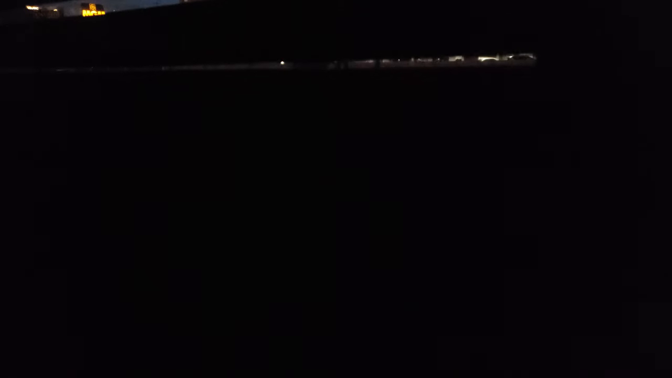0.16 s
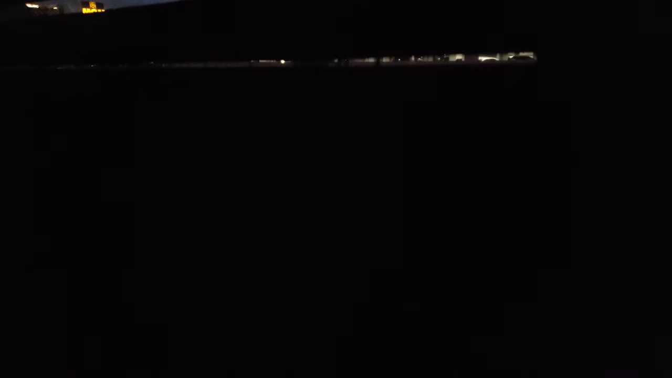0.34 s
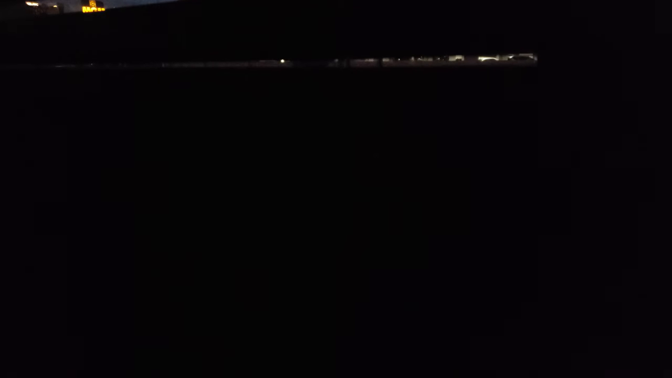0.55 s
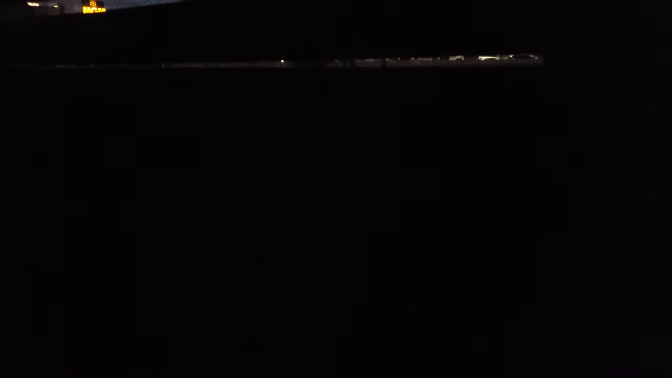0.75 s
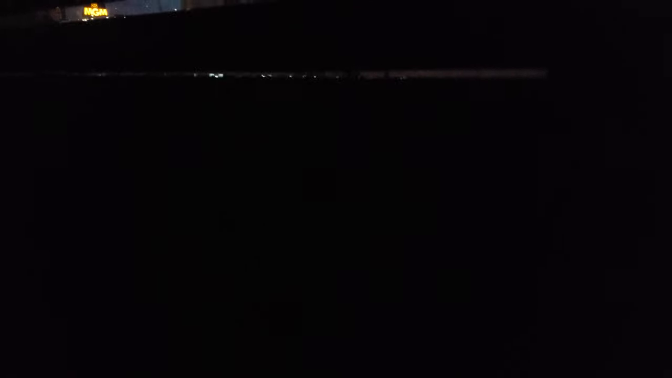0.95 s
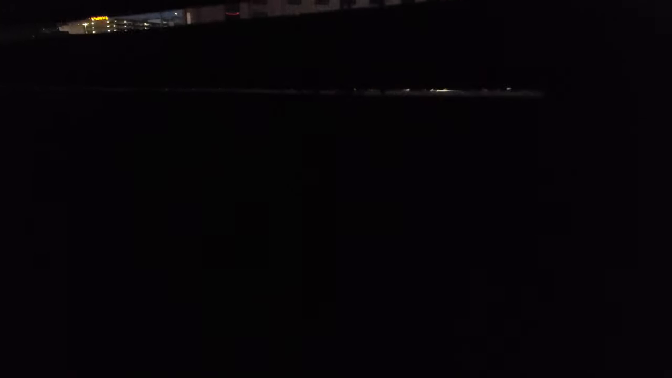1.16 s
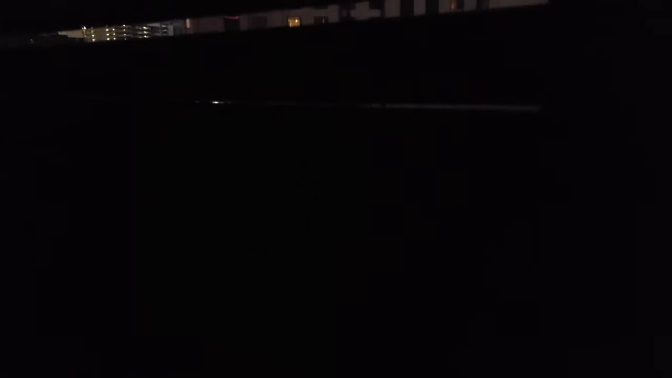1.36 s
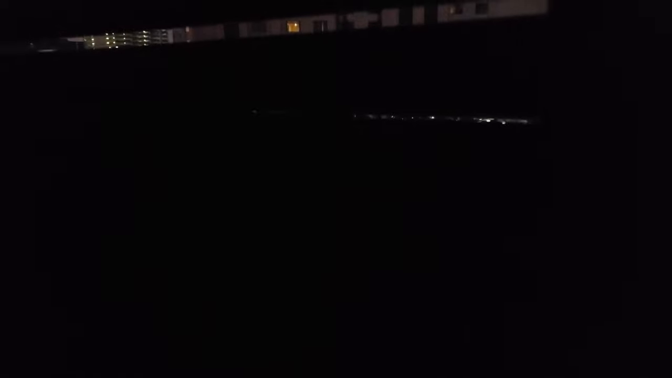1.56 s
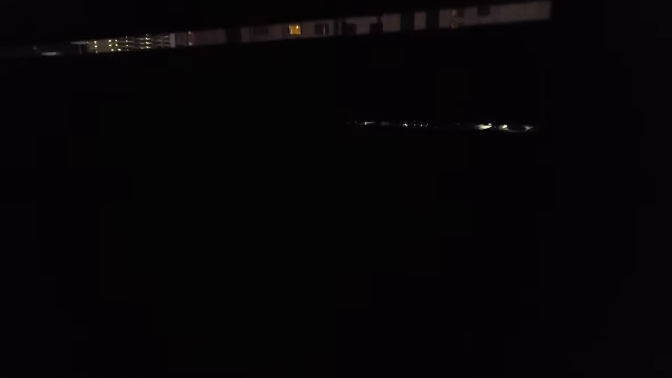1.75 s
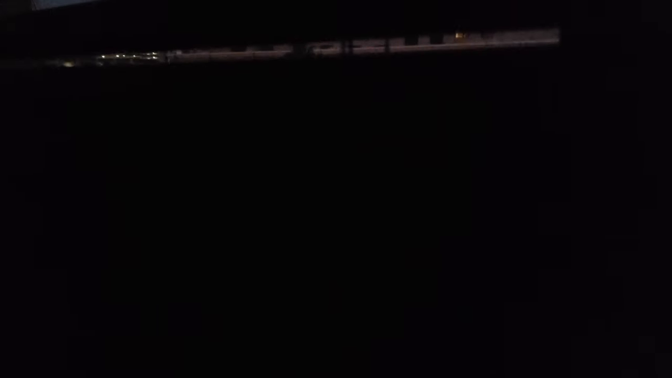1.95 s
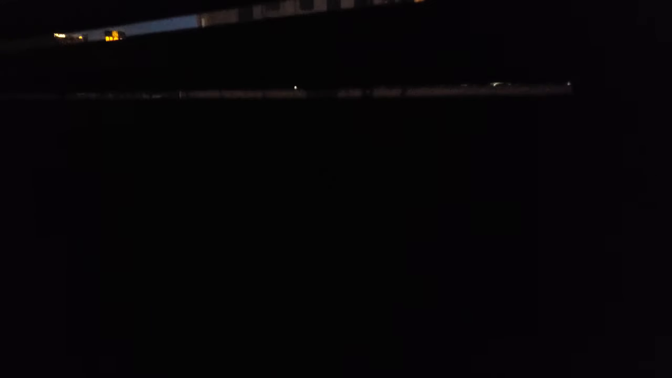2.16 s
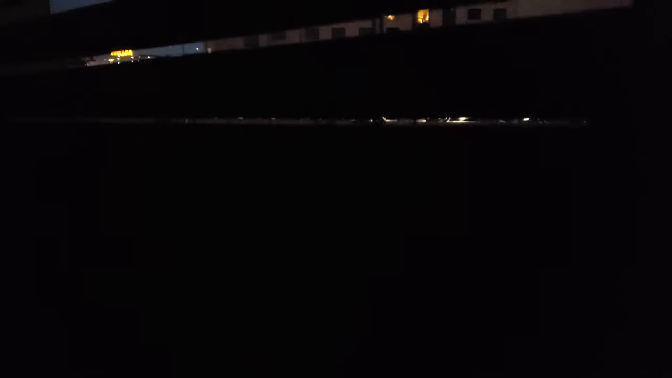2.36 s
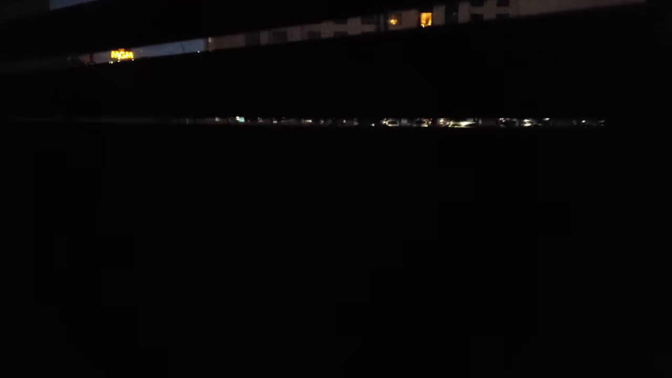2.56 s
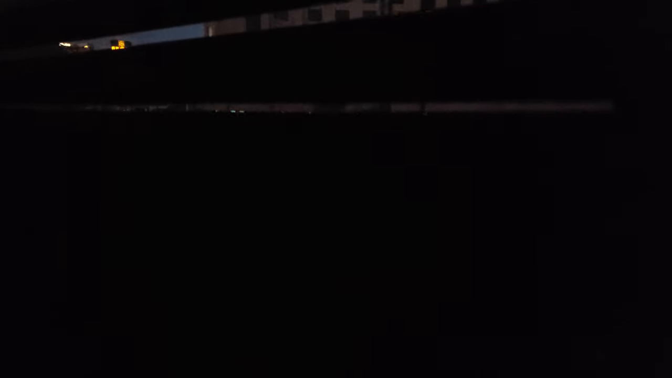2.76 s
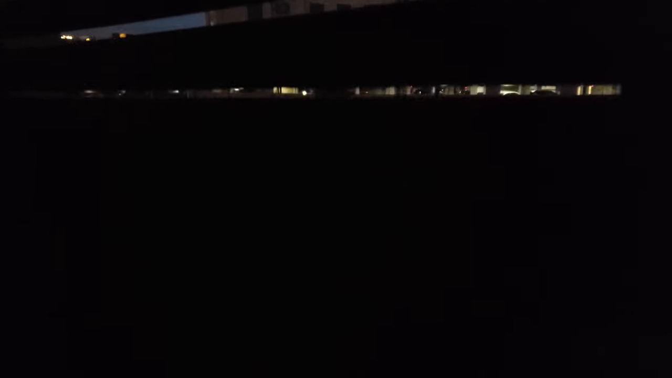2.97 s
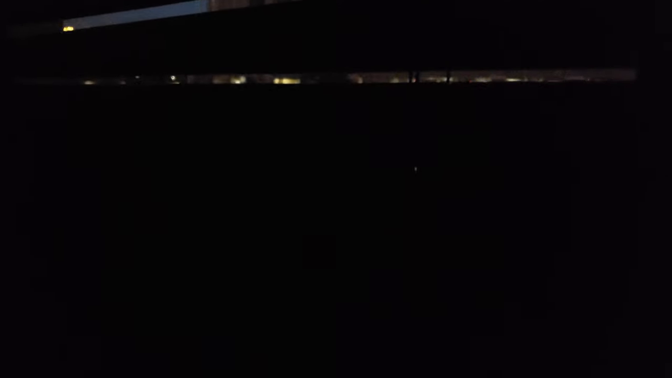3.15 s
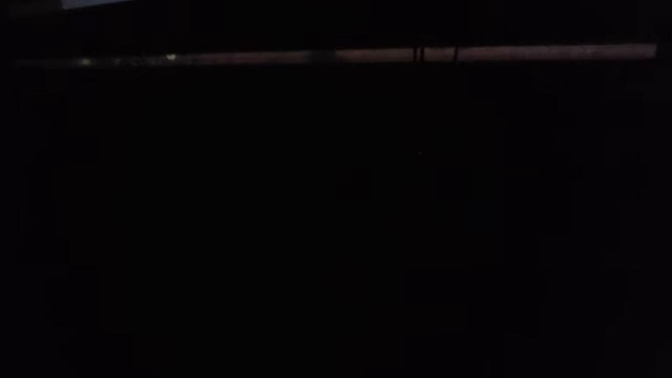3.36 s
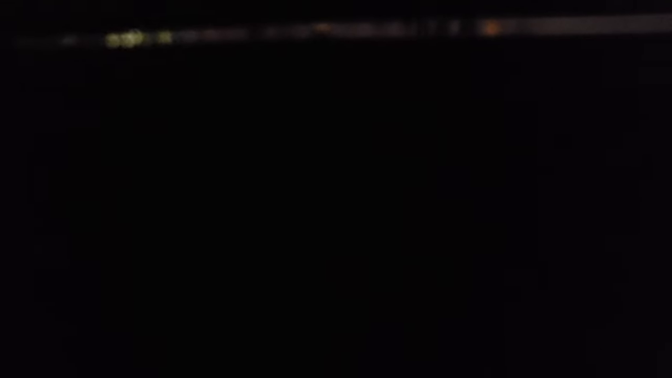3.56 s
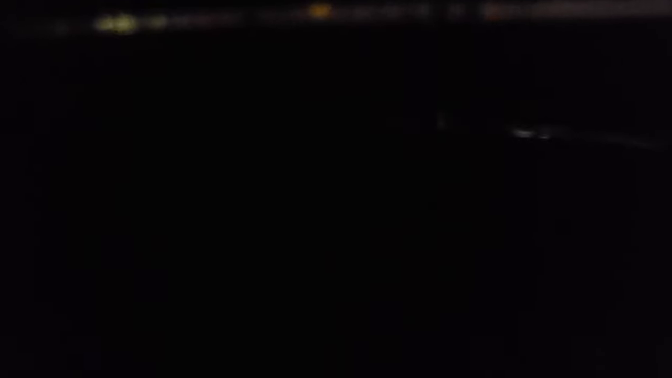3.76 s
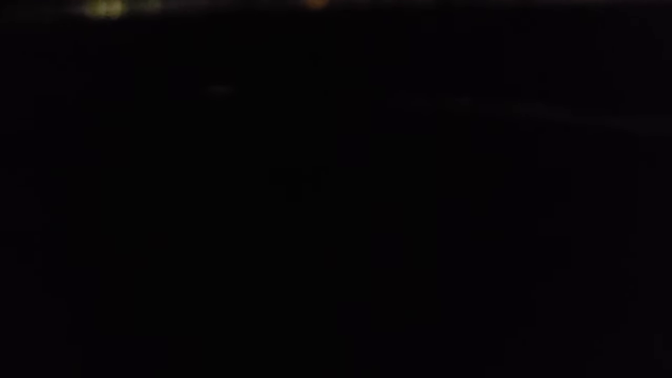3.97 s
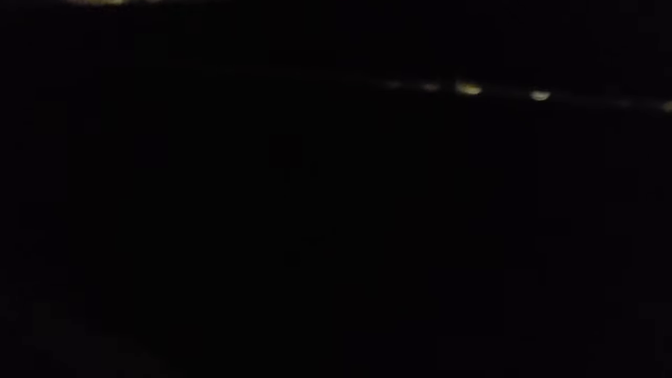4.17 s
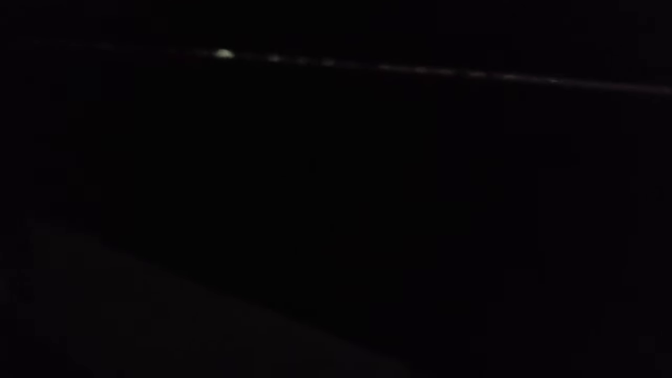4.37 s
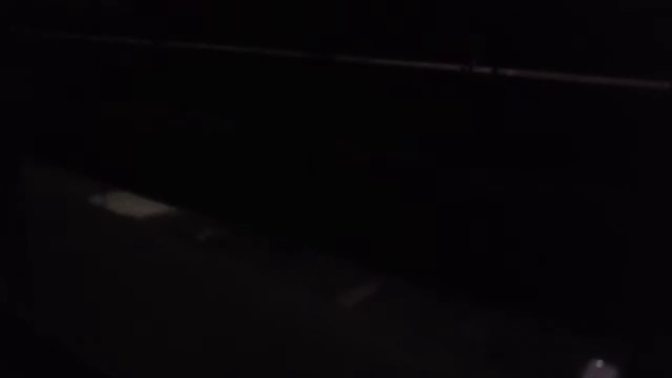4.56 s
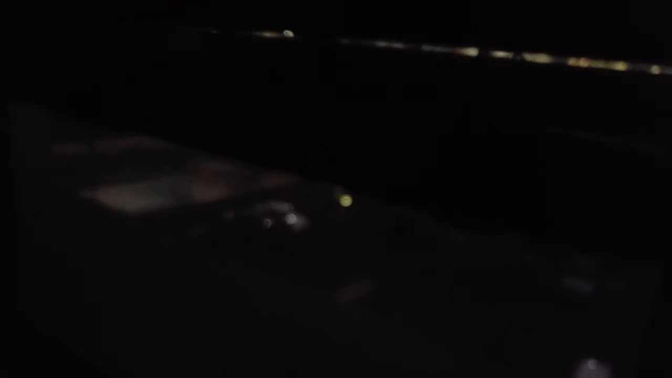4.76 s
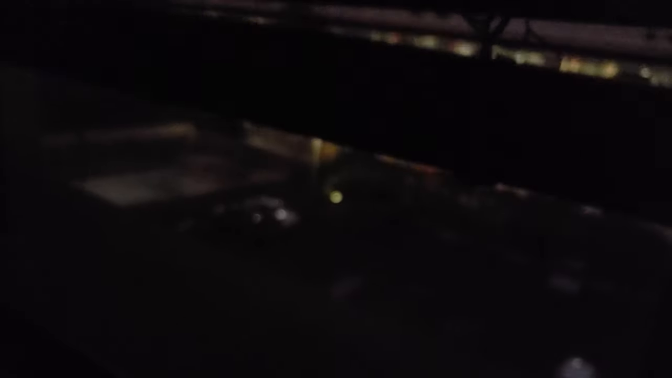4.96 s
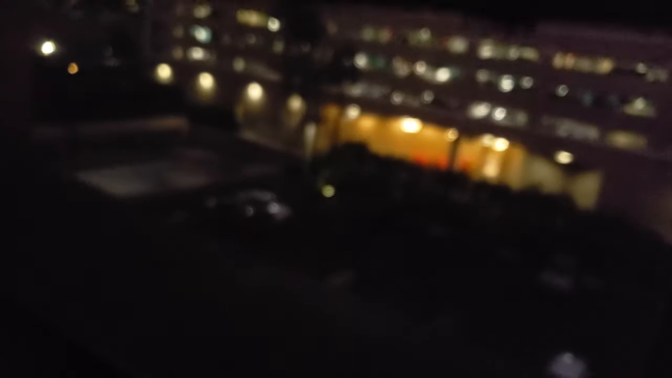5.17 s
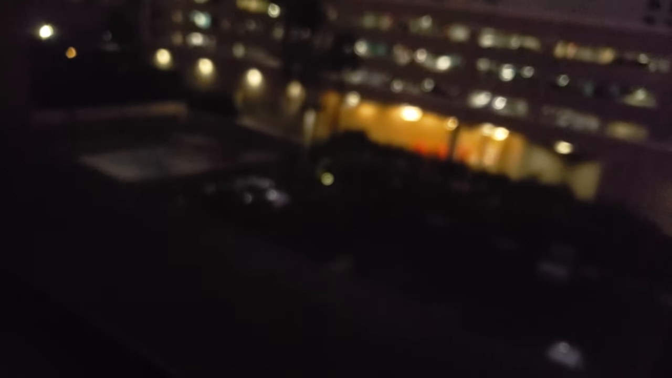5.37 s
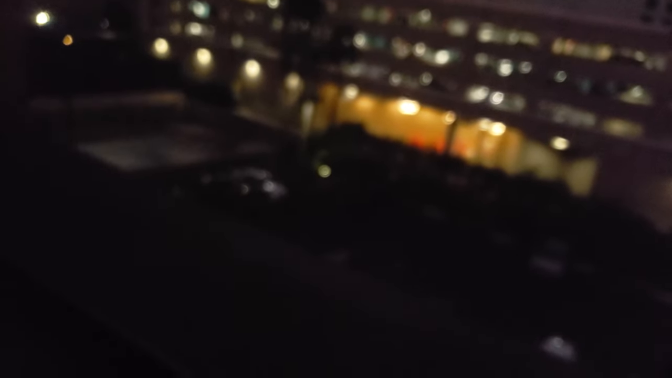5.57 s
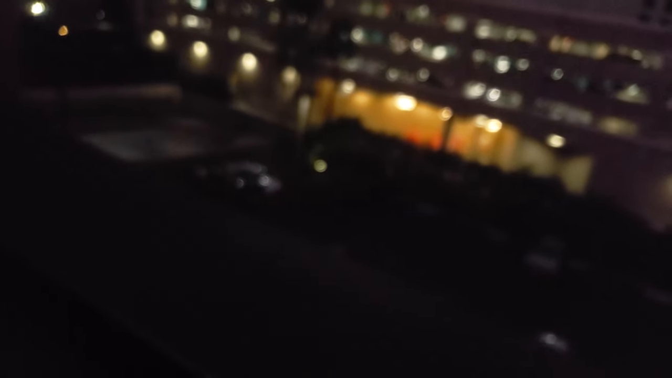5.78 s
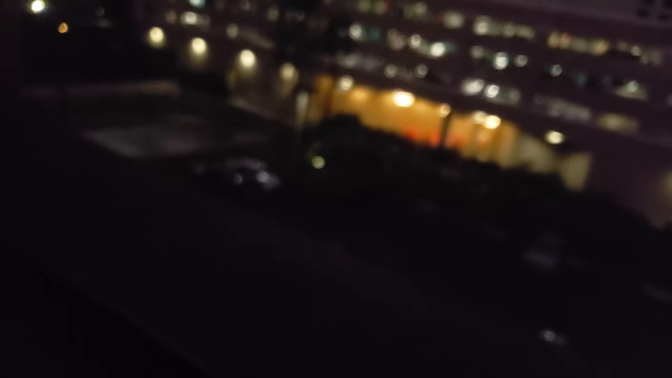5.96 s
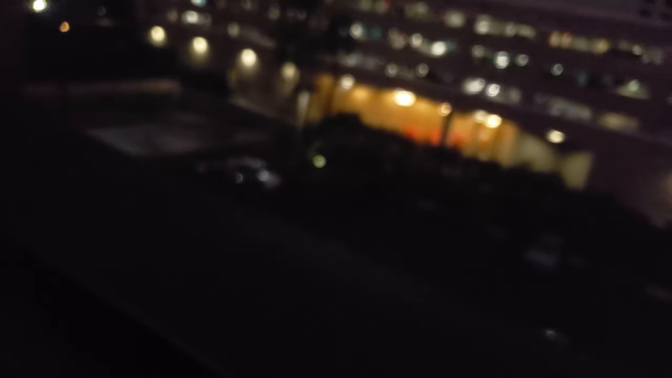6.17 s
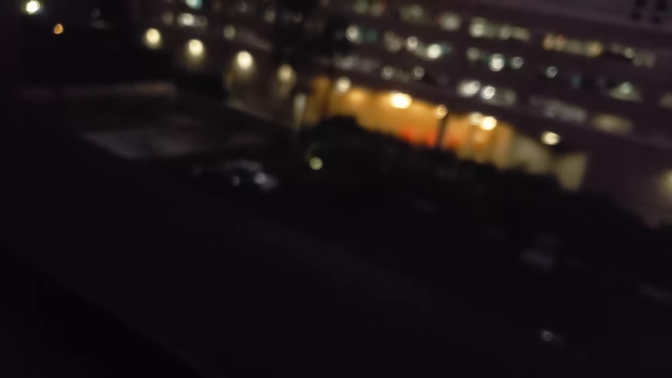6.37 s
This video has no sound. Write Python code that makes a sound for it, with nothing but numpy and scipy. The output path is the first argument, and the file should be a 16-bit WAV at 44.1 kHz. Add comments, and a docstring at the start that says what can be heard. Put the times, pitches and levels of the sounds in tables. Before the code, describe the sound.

Close stereo microphones in a quiet room with faint outdoor rumble and hiss. Fingers brush lightly, with small ticks, creaks and little squeaks. Then a slatted window blind is pulled up: the cord whirrs, slats rustle and rattle densely, with irregular sharp clacks. The bottom rail bumps home with a dull knock and a bright snap, the rattling quickly fades, and a few weak clicks settle.

```python
"""A slatted window blind is pulled up in a quiet room, heard from close by with two small microphones.
Slats and cord strike and rattle as short noise bursts that ring in the blind's resonances; tiny chance contacts
rustle, and bands of noise whirr as the cord runs through the head rail. Before that, fingers brush and find the
cord with light ticks and creaks; at the end the bottom rail bumps home. The room answers with noise echoes.
Below it all lies shaped noise: low rumble from outside and a faint hiss."""
import sys
import numpy as np
from scipy import signal
from scipy.fft import rfft, irfft, next_fast_len
from scipy.io import wavfile
from scipy.ndimage import uniform_filter1d

SR = 44100
rng = np.random.default_rng(int(sys.argv[2]) if len(sys.argv) > 2 else 0)


def field_ratio(decibels):
    """Amplitude ratio for a level in dB (20 dB per decade); scalars and array-likes work."""
    return 10 ** (np.asarray(decibels, dtype=float) / 20)


def master_out(mix):
    """Clip the mix to full scale and print it as 16-bit PCM to the path in sys.argv[1]."""
    frames = np.transpose(np.atleast_2d(mix))
    ceiling = np.clip(frames, -1, 1)
    pcm = np.round(ceiling * 32767).astype(np.int16)
    wavfile.write(sys.argv[1], SR, pcm)


N = 283197   # length [samples]

# resonances of rail and slats: (pitch [Hz], width [Hz], level against the plain contact [dB])
BLIND_MODES = [(764, 125, 3), (883, 110, 5), (1170, 910, 2), (1317, 52, -10), (1825, 110, -6),
               (2260, 210, -0.5), (2755, 550, -2.5), (3230, 200, 0.5), (3950, 1000, -2), (4500, 560, -17.5),
               (6500, 2300, -7), (6960, 81, -12), (11470, 5400, 2), (14400, 570, -2.5)]
# how hard the blind is moved: (time [s], slat rustle level [dB], extra brightness [dB])
MOTION = [(0, -91, -7), (.41, -89, -1.5), (1.23, -83, 4.5), (1.36, -81, 2), (1.74, -77.5, 3),
          (1.76, -58.5, -4), (1.88, -67, 9), (2.0, -93, -1), (2.2, -73, -3), (2.3, -78.5, 4),
          (2.4, -84, -6), (2.77, -86.5, 1), (3.06, -74.5, 0.5), (3.15, -62, 1), (3.18, -52, -4),
          (3.26, -52, -1), (3.35, -47, -5.5), (3.5, -49.5, 2), (3.66, -44, -3), (3.79, -45, 0),
          (3.97, -42.5, -1.5), (4.11, -46, -1), (4.45, -45, 3), (4.67, -47.5, -1), (4.78, -53, 7),
          (4.88, -54, -1), (5.02, -63, 2), (5.06, -40.5, -2), (5.13, -41.5, 3.5), (5.22, -46.5, -1),
          (5.42, -60.5, 0.5), (5.6, -65, -1.5), (5.65, -56, 1), (5.92, -65, -3), (6.08, -62, 1),
          (6.28, -83, 5), (6.42, -90.5, 13)]
FULL_PULL_DB = -45   # the rustle level that counts as a full pull
CLACK_T60_S = 0.019   # time in which a clack's burst falls by 60 dB


def in_time(rows):
    """Reads the columns of a table at every sample; the first column is the time."""
    s, *columns = np.transpose(rows)
    t = np.arange(N) / SR
    return [np.interp(t, s, column) for column in columns]


def at_hz(points, hz):
    """Reads a table over frequency, on a logarithmic axis."""
    table_hz, values = np.transpose(points)
    return np.interp(np.log(hz + 1), np.log(table_hz), values)


def rms_one(x):
    """Scales a sound to an rms of 1."""
    return x / np.sqrt(np.mean(x ** 2) + 1e-30)


def panned(db):
    """Left and right gains for a level difference; above 0 dB the left is louder."""
    return field_ratio(np.array([db / 2, -db / 2]))


def wavering(span_s):
    """A slow random drift around 0 with an rms of 1: noise smoothed twice."""
    span = max(int(span_s * SR), 1)
    smooth = uniform_filter1d(rng.standard_normal(N), span)
    return rms_one(uniform_filter1d(smooth, span))


def two_ears(pair, gain):
    """Turns two unrelated signals into left and right, alike in the bass, and colours them by gain(hz)."""
    # how alike left and right are: (frequency [Hz], likeness [0 to 1])
    likeness = [(60, 0.93), (120, 0.99), (240, 0.92), (480, 0.82), (950, 0.47), (1890, 0.02), (3770, 0.013),
                (7520, 0.02), (15000, 0.01)]
    # the two microphones differ: (frequency [Hz], left minus right [dB])
    left_colour = [(60, 2.0), (120, 2.5), (240, 2), (480, 3.5), (950, 0.5), (1890, 2), (3770, 2.5),
                   (7520, 5.5), (15000, -6)]
    hz = np.fft.rfftfreq(pair.shape[1], 1 / SR)
    alike = np.clip(at_hz(likeness, hz), 0, 1)
    mid, side = rfft(pair)
    mid = mid * np.sqrt(1 + alike)
    side = side * np.sqrt(1 - alike)
    left_right = np.array([mid + side, mid - side])
    return irfft(left_right * gain(hz) * panned(at_hz(left_colour, hz)), pair.shape[1])


def three_bands(x):
    """Splits into low, middle and treble parts that overlap gently and add up to the whole."""
    hz = np.fft.rfftfreq(x.shape[1], 1 / SR)
    low = 1 / (1 + (hz / 2300) ** 4)
    treble = 1 / (1 + (9000 / (hz + 1)) ** 8)
    return [irfft(rfft(x) * share, x.shape[1]) for share in (low, 1 - low - treble, treble)]


def one_band(size, centre_hz, width_hz):
    """Stereo noise in one resonance."""
    return two_ears(rng.standard_normal((2, size)), lambda hz: 1 / (1 + (2 * (hz - centre_hz) / width_hz) ** 2))


def resonances(modes, hz, chance_db):
    """A flat response with resonances on top, each made stronger or weaker by its chance_db."""
    response = 1
    for (mode_hz, width_hz, db), chance in zip(modes, chance_db):
        response = response + field_ratio(db + chance) / (1 + 2j * (hz - mode_hz) / width_hz)
    return response


def coloured(modes, hz, chance_db):
    """Response to a contact: its plain colour times the resonances of what is struck."""
    # plain contact: (frequency [Hz], level per Hz [dB])
    contact = [(180, -45.5), (300, -13.5), (411, -15), (553, -12), (708, -11), (985, -8.5), (1510, -2),
               (2520, -12), (7140, -12.5), (9600, -13.5), (11700, -17.5)]
    return field_ratio(at_hz(contact, hz)) * resonances(modes, hz, chance_db)


def strikes(table, modes, rise_s, t60_s):
    """Each strike is a noise burst that dies in a few ms and excites every mode with a chance strength."""
    size, lead = 2048, 256   # samples; the lead is the stretch before the hit
    out = np.zeros((2, N + size))
    t = np.maximum(np.arange(size) - lead, 0) / SR
    envelope = field_ratio(-60 * t / t60_s) * (1 - np.exp(-t / rise_s))
    for s, middle_db, low_db, treble_db, pan_db in table:
        burst = rng.standard_normal((2, size)) * envelope
        chance_db = 4 * rng.standard_normal(len(modes))
        ringing = two_ears(burst, lambda hz: coloured(modes, hz, chance_db))
        hit = 0
        for db, band in zip((low_db, middle_db, treble_db), three_bands(ringing)):
            peak = np.abs(band).max(axis=1, keepdims=True)
            hit = hit + field_ratio(db) * band / peak
        at = round(s * SR) - lead
        out[:, at:at + size] += hit * panned(pan_db)[:, None]
    return out[:, :N]


def quiet_air():
    """Rumble from outside, stronger at a few drone pitches, and hiss: shaped noise that swells and sinks."""
    # rumble and hiss: (frequency [Hz], level per Hz [dB])
    air_colour = [(15, -25), (25, -4), (70, 0), (92, 1), (154, -1), (330, -16), (457, -28), (496, -20),
                  (617, -23), (726, -23.5), (1060, -22), (1510, -57), (8370, -55), (15200, -42),
                  (16500, -60)]
    # resonances in the rumble: (pitch [Hz], width [Hz], level against the plain rumble [dB])
    drones = [(62, 7.8, -2.5), (140, 5, 7), (281.7, 8.7, 7), (357, 15, 0.5), (739, 42, 6.5)]
    # loudness of the whole: (time [s], level [dB])
    air_level = [(0.0, -51.5), (0.5, -50), (0.95, -51), (1.82, -48), (2.05, -50.5), (3.0, -50), (3.2, -49),
                 (4.54, -50.5), (4.83, -46.5), (5.11, -46.5), (5.4, -55.5), (6.42, -51.5)]

    def colour(hz):
        return field_ratio(at_hz(air_colour, hz)) * resonances(drones, hz, np.zeros(len(drones)))

    noise = two_ears(rng.standard_normal((2, next_fast_len(N))), colour)[:, :N]
    return rms_one(noise) * field_ratio(in_time(air_level)[0])


def room(x):
    """Diffuse echoes: noise that dies at its own pace in each octave, alike on both sides in the bass."""
    # how long echoes last: (frequency [Hz], time to fall by 60 dB [s])
    echo_t60 = [(300, 0.99), (1500, 0.2), (5000, 0.43), (15000, 0.06)]
    t, tail = np.arange(SR // 2) / SR, 0
    for hz in 125 * 2. ** np.arange(8):
        edges_hz = [hz / np.sqrt(2), min(hz * np.sqrt(2), 20000)]
        octave = signal.butter(1, edges_hz, "band", fs=SR, output="sos")
        noise = two_ears(rng.standard_normal((2, len(t))), np.ones_like)
        t60_s = at_hz(echo_t60, hz)
        tail = tail + signal.sosfilt(octave, noise) * field_ratio(-60 * t / t60_s) / np.sqrt(t60_s)
    tail = tail * (1 - np.exp(-t / 0.0028))   # the echoes set in within a few ms
    tail = tail / np.sqrt(np.sum(tail ** 2) / 2)
    return signal.fftconvolve(x, tail, axes=1)[:, :N]


def fingers():
    """Skin sliding on a smooth surface close to the right microphone: thin, high noise that flutters."""
    # brushes: (start [s], hold [s], level [dB])
    brushes = [(0.563, .08, -81), (.9, 0.35, -79.5), (1.29, 0.16, -75), (1.534, .05, -70),
               (1.747, 0.097, -71), (2.083, .05, -78), (2.273, 0.065, -59)]
    attack_db_per_s, release_db_per_s = 600, 400
    t, strength = np.arange(N) / SR, 0
    for s, hold, db in brushes:
        before, after = np.maximum(s - t, 0), np.maximum(t - s - hold, 0)
        strength = strength + field_ratio(db - attack_db_per_s * before - release_db_per_s * after)
    noise = rms_one(one_band(next_fast_len(N), 14900, 4400)[:, :N])
    flutter = field_ratio(1.0 * wavering(0.0072))
    return strength * noise * flutter * panned(-14.5)[:, None]


def ticks():
    """Light ticks close to the microphones: very short bursts that ring in high resonances."""
    # peaks: (time [s], middle level [dB], low level [dB], treble level [dB], left minus right [dB])
    tick_rows = [(1.3683, -67, -69, -51, -1), (1.5294, -75, -77, -50, -10), (1.728, -58, -67, -47, 1),
                 (2.1278, -43, -46.5, -29.5, -12), (2.1556, -39, -59, -55, 13), (2.1676, -30, -62, -31, -2),
                 (2.1912, -31.5, -68, -49, 9), (2.1977, -39, -56, -31.5, -14), (2.2024, -45, -65, -38, -21),
                 (2.3333, -52, -63, -32.5, -13), (5.0603, -27, -37, -8, -5), (5.0887, -8, -12, -1.5, -8),
                 (5.0997, -28, -28, -6, -8)]
    # what the ticks ring with: (pitch [Hz], width [Hz], level against the plain contact [dB])
    tick_modes = [(1930, 280, -10), (3600, 600, 0.5), (5000, 1200, 5.5), (6930, 430, 15.5), (12000, 700, 5),
                  (15000, 1800, 6)]
    return strikes(tick_rows, tick_modes, rise_s=0.00006, t60_s=0.006)


def rings():
    """Creaks, knocks and squeaks: noise in one resonance that swells and dies, at most 0.19 s long."""
    # creaks that swell fast and die: (time [s], pitch [Hz], width [Hz], level [dB], 60 dB decay time [s])
    creaks = [(1.29, 1840, 250, -68.5, 0.16), (1.289, 6600, 1500, -73, 0.32),
              (1.549, 6500, 1800, -70, 0.19), (1.81, 4780, 800, -54.5, 0.12),
              (1.799, 6800, 1500, -61.5, .25), (3.31, 2900, 1000, -46, 0.17)]
    # knocks that ring at one pitch: (time [s], pitch [Hz], width [Hz], level [dB], 60 dB decay time [s])
    knocks = [(1.404, 610, 202, -55.5, 0.36), (1.587, 590, 250, -55, 0.26), (1.749, 1863, 110, -42, 0.16),
              (1.751, 2160, 900, -51.5, 0.47), (2.187, 3600, 400, -56, 0.23),
              (4.734, 350, 200, -40.5, 0.54), (5.039, 333, 140, -30, 0.082), (5.058, 213, 123, -37, 0.091),
              (5.040, 151, 60, -35.5, 0.1), (5.041, 697, 250, -34.5, 0.15),
              (5.496, 1140, 600, -48.5, 0.084), (5.646, 2950, 300, -51, 0.027), (5.833, 968, 510, -58, .14)]
    # squeaks that grow until the finger lets go: (start [s], pitch [Hz], width [Hz], level [dB], length [s])
    squeaks = [(2.054, 5000, 400, -61.5, 0.11), (2.06, 1860, 170, -58, 0.088),
               (2.067, 9300, 805, -65, 0.088), (2.249, 3700, 500, -65.5, 0.094),
               (2.263, 2210, 352, -54.5, 0.083)]
    size = 8192
    out, t = np.zeros((2, N + size)), np.arange(size) / SR

    def dying(rise_s, t60_s):
        return field_ratio(-60 * t / t60_s) * (1 - np.exp(-t / rise_s)) ** 2

    def growing(length_s):
        return np.minimum(t / length_s, 1) * field_ratio(-60 * np.maximum(t - length_s, 0) / 0.08)

    rows = [(*row, dying(0.25 * t60_s, t60_s)) for *row, t60_s in creaks]
    rows += [(*row, dying(0.0036, t60_s)) for *row, t60_s in knocks]
    rows += [(*row, growing(length_s)) for *row, length_s in squeaks]
    for s, hz, width_hz, db, shape in rows:
        sound = one_band(size, hz, width_hz) * shape
        # the level counts at the loudest moment of the swell
        scale = np.sqrt(np.mean(shape ** 2) / np.mean(sound ** 2)) / shape.max()
        at = round(s * SR)
        out[:, at:at + size] += field_ratio(db) * sound * scale
    return out[:, :N]


def whirr():
    """The running cord drives the head rail's resonances with friction noise that wavers a little."""
    # swing of the whirr: (time [s], level against the full whirr [dB])
    swing = [(2.7, -35), (2.9, -36), (3.05, -15), (3.3, -4), (3.62, 3), (4.14, 0.5), (4.42, 1.5),
             (4.72, 1.5), (4.85, -12.5), (5.22, -19.5), (5.4, -9), (5.75, -11.5), (6.1, -11.5), (6.25, -24),
             (6.42, -39.5)]
    # rail resonances: (pitch [Hz], width [Hz], level at full whirr [dB], share of the swing [factor])
    whirr_bands = [(714, 41, -52, 1.13), (1510, 190, -48, 0.89), (1800, 510, -50, .9),
                   (3170, 800, -54.5, 2.8), (6800, 1800, -58, 0.67)]
    running = np.arange(N) > swing[0][0] * SR
    swing_db = in_time(swing)[0]
    total = 0
    for hz, width_hz, db, share in whirr_bands:
        noise = rms_one(one_band(next_fast_len(N), hz, width_hz)[:, :N])
        total = total + noise * field_ratio(db + share * swing_db + 1.5 * wavering(0.012))
    return running * total


def rubbing():
    """Thousands of tiny uneven contacts a second ring the blind; three bands drift on their own."""
    rustle_db, bright_db = in_time(MOTION)
    # the rail is at -46 dB at full pull, before brightness, and follows the rustle by three quarters
    rail_db = -46 + 0.75 * (rustle_db - FULL_PULL_DB) - bright_db / 2
    fizz_db = rustle_db - 1.5 + bright_db
    size, contacts_per_s = next_fast_len(N), 6000
    grains = (rng.random((2, size)) < contacts_per_s / SR) * rng.choice([-1, 1], (2, size))
    grains = grains * field_ratio(3 * np.minimum(rng.exponential(1, (2, size)), 5))   # a few are much stronger
    no_chance = np.zeros(len(BLIND_MODES))
    sound = two_ears(grains, lambda hz: coloured(BLIND_MODES, hz, no_chance))[:, :N]
    rail, rustle, fizz = [rms_one(band * field_ratio(1.5 * wavering(0.058))) for band in three_bands(sound)]
    fizz = fizz * panned(2.5)[:, None]
    return rail * field_ratio(rail_db) + rustle * field_ratio(rustle_db) + fizz * field_ratio(fizz_db)


def rattles():
    """Small strikes on the blind at chance moments, more and louder the harder the pull."""
    most_per_s, full_pull_per_s = 40, 20
    draws = rng.random((int(most_per_s * N / SR), 6))
    s = 0.01 + 0.98 * draws[:, 0] * N / SR
    rustle_db = in_time(MOTION)[0][(s * SR).astype(int)]
    kept = most_per_s * draws[:, 1] < full_pull_per_s * field_ratio(rustle_db - FULL_PULL_DB)
    middle, low, treble, pan_db = 1.5 * (4 * draws[:, 2:] - 2).T   # chance differences [dB]
    peak_db = rustle_db + 9
    rows = np.column_stack([s, peak_db + middle, peak_db + low, peak_db + treble + 0.5, pan_db])
    return strikes(rows[kept], BLIND_MODES, rise_s=0.00014, t60_s=CLACK_T60_S)


def clacks():
    """Slats and cord strike: short bursts that ring in the resonances of the blind."""
    # peaks: (time [s], middle level [dB], low level [dB], treble level [dB], left minus right [dB])
    clack_rows = [(1.4047, -55, -47.5, -53, 5), (1.5845, -69, -46.5, -59, 2),
                  (1.7125, -56.5, -75, -59, -23), (1.7514, -39, -38.5, -66, -1),
                  (3.1612, -37, -25.5, -67, 12.5), (3.1794, -36, -29.5, -55, -4),
                  (3.4834, -37, -58, -29, -4.5), (3.6233, -18, -33, -24.5, -5), (3.6344, -17, -30, -48, 0),
                  (3.6494, -22.5, -45, -41.5, 5), (3.6659, -20.5, -32, -27.5, -18),
                  (3.675, -28.5, -17.5, -42, 6), (3.8251, -28, -24, -24, -2), (3.8477, -24, -24.5, -47, 4),
                  (3.9147, -18, -38, -16, 4.5), (3.9396, -28, -24, -39, -1), (3.9754, -51.5, -48, -29, -5),
                  (4.012, -18.5, -43, -25, -9.5), (4.0152, -11.5, -21.5, -24, 9.5),
                  (4.0194, -19.5, -14.5, -47.5, -5), (4.2614, -30, -32, -33, 10),
                  (4.3142, -23.5, -28.5, -32, 4.5), (4.346, -12, -14.5, -19, 4), (4.358, -24, -66, -42, -9),
                  (4.514, -28.5, -33.5, -40, 7), (4.52, -34.5, -26.5, -38, 1),
                  (4.7049, -28, -26.5, -24, -3), (4.7159, -11, -18.5, -31, 0.0),
                  (4.724, -29, -12.5, -19.5, 1), (4.7384, -14.5, -16.5, -25.5, -0.5),
                  (4.7534, -31.5, -20, -44.5, -4.5), (5.0438, -29, -34.5, -36.5, -1),
                  (5.1092, -20.5, -32, -35.5, 5.5), (5.1254, -22, -24, -27.5, -0.5),
                  (5.228, -15, -56, -25.5, 3.5), (5.2383, -26, -29, -32, -2), (5.2503, -35, -53, -43.5, 1),
                  (5.5064, -49, -33.5, -48, 6), (5.7972, -32, -41, -66, -1), (5.8304, -46, -38, -62, 8),
                  (5.8455, -45, -33.5, -61, 3)]
    return strikes(clack_rows, BLIND_MODES, rise_s=0.0007, t60_s=CLACK_T60_S)


def scene():
    """Clacks, rattles, ticks and rings with their echoes, over whirr, rubbing, fingers and the quiet air."""
    steady = quiet_air() + fingers() + whirr() + rubbing()
    close = ticks() + rings()
    struck = rattles() + clacks()
    echoes = room(field_ratio(-5) * struck + field_ratio(-17) * close)   # the close sounds wake the room less
    return struck + close + steady + echoes


def top_cut(x):
    """Nothing passes above the cut-off."""
    return signal.sosfilt(signal.butter(12, 16970, fs=SR, output="sos"), x)


def record(dry):
    """The microphones dip near 8 kHz and lift the top treble; a steep low-pass ends the sound at 16 kHz."""
    # microphone colour, then in the last two points the steep low-pass: (frequency [Hz], level [dB])
    colour_and_low_pass = [(2000, 0), (7400, 0.5), (8200, -4.5), (10500, -0.5), (11600, 4.5), (15850, 4.5),
                           (16150, -35.5)]
    size = next_fast_len(N)
    response = field_ratio(at_hz(colour_and_low_pass, np.fft.rfftfreq(size, 1 / SR)))
    heard = irfft(rfft(dry, size) * response, size)[:, :N]
    headroom = 0.72   # loud peaks are rounded to stay below this
    heard = headroom * np.tanh(heard / headroom)
    return top_cut(heard)


dry = scene()
out = record(dry)
master_out(out)
```